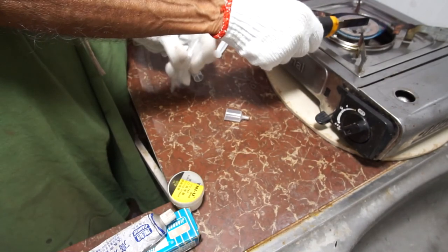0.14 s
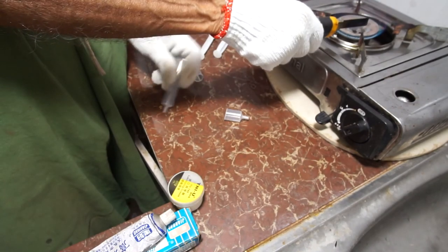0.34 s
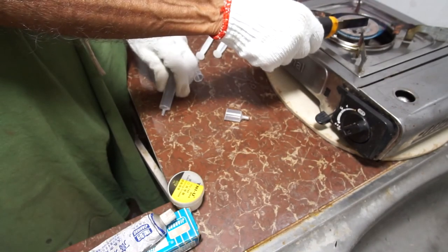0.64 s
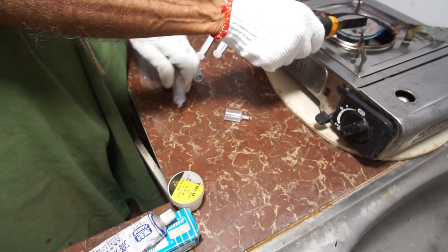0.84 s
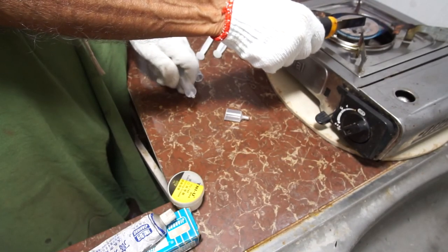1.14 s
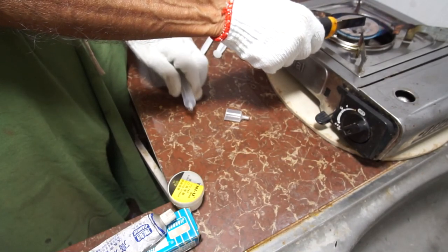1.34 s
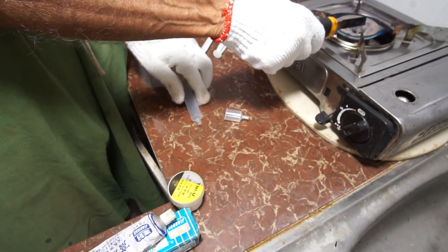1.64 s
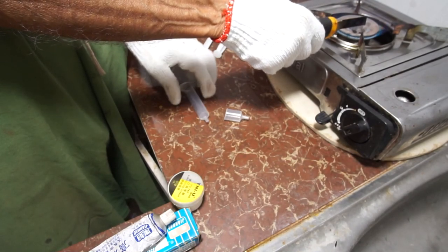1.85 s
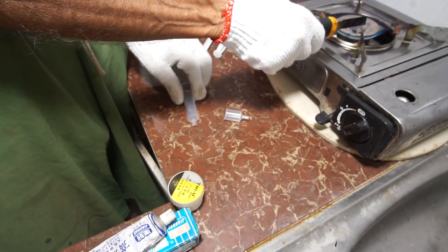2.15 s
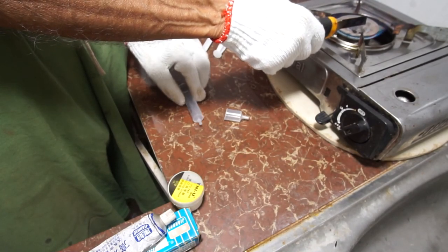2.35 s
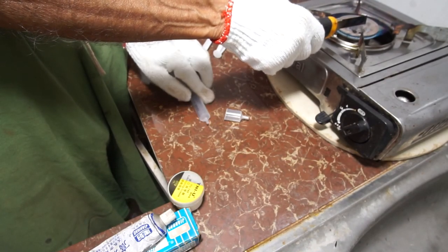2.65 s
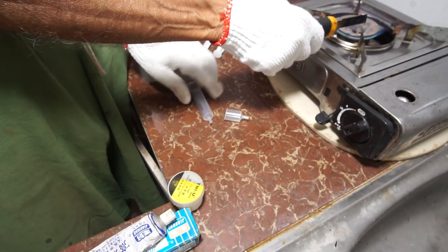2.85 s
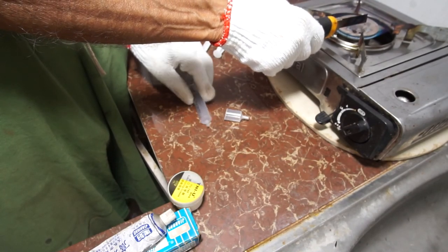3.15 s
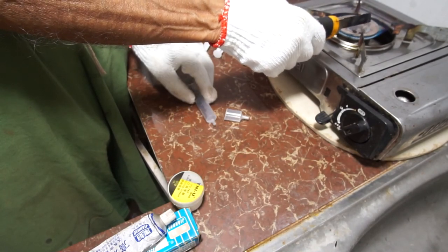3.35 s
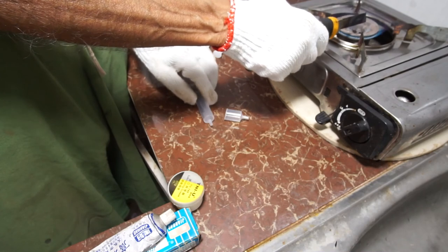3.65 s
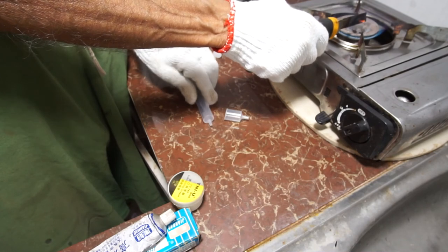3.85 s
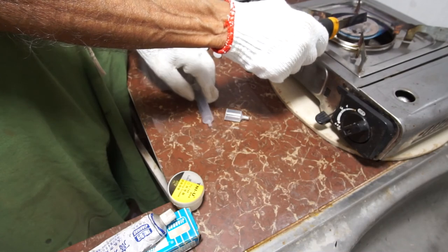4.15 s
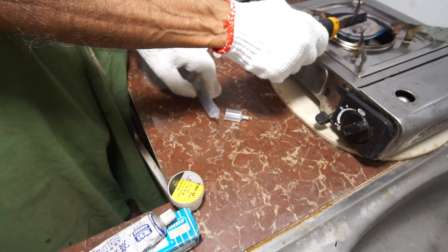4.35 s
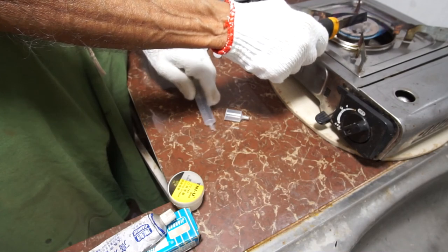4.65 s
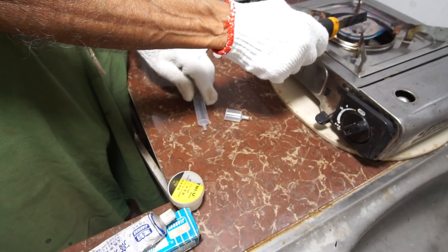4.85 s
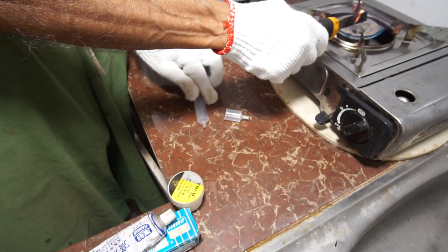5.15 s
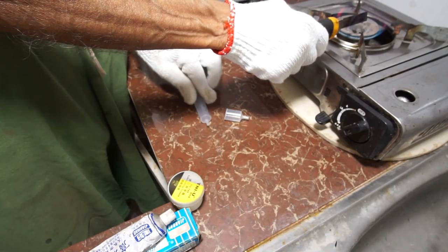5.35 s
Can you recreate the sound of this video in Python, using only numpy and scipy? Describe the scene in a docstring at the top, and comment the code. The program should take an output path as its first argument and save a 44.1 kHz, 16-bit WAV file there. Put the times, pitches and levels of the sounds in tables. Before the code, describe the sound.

In a small hard kitchen, a gas burner hums and hisses faintly with a thin unsteady high whistle. A gloved hand taps a plastic syringe on a stone counter: a small click at first, a rapid rattle before two seconds, a long near-quiet gap, then a click, a scrape and the loudest double tap near the end. Close stereo microphones; treble leans right.

```python
"""A gloved hand taps, rattles and slides a plastic syringe on a kitchen counter; clicks excite damped modes.
Beside it a gas burner runs: shaped noise makes the low hum of its flame and the hiss of its jet,
and a shaken sine makes the jet's thin, unsteady whistle. Filtered noise makes the sleeve and the slides.
The small kitchen answers each click with decaying noise, and loud sound makes the recorder turn its gain down."""
import sys
import numpy as np
from scipy import signal
from scipy.fft import rfft, irfft, next_fast_len
from scipy.io import wavfile
from scipy.ndimage import map_coordinates

SR = 44100
rng = np.random.default_rng(int(sys.argv[2]) if len(sys.argv) > 2 else 0)


def output_pcm(signal):
    """Save a mono or channel-first signal as 16-bit PCM at the path in sys.argv[1].

    Samples are clipped to [-1, 1] before scaling.
    """
    pcm = np.clip(np.atleast_2d(signal).T, -1, 1) * 32767
    wavfile.write(sys.argv[1], SR, np.round(pcm).astype(np.int16))


N = 241834

# stereo balance, negative to the right: (frequency [Hz], left over right [dB])
STEREO_LEAN = [(100, 0.7), (700, 0), (1700, -3), (3000, -6), (5200, -9.5), (7000, -6.5), (10000, -8.5)]


def amp(db):
    """Decibels to gain."""
    return 10 ** (np.asarray(db) / 20)


def unit(x):
    """Scale to rms 1."""
    return x / np.sqrt(np.mean(x ** 2) + 1e-20)


def along(points, hz):
    """Read (frequency, value) points on a log frequency axis."""
    point_hz, value = np.transpose(points)
    return np.interp(np.log(hz + 1), np.log(point_hz + 1), value)


def wobble(rate):
    """A smooth random curve of rms 1, with rate knots a second."""
    knots = rng.standard_normal(int(N * rate / SR) + 4)
    return unit(map_coordinates(knots, [np.arange(N) * rate / SR]))


def filtered(x, response):
    """Filter x by a response of frequency."""
    n = x.shape[-1]
    padded = next_fast_len(n + 8192)
    spectrum = rfft(x, padded) * response(np.fft.rfftfreq(padded, 1 / SR))
    return irfft(spectrum, padded)[..., :n]


def sides(lean_db):
    """Left and right gains for a level difference, left over right."""
    return amp(np.array([[.5], [-.5]]) * lean_db)


def diffuse(x):
    """Turn two unrelated noises into a left and right that are alike in the bass and less so in the treble."""
    # likeness of diffuse sound at the two microphones: (frequency [Hz], correlation [0-1])
    likeness = [(60, 1), (130, 0.91), (270, 0.88), (1000, 0.9), (5000, 0.77), (11000, 0.57)]

    def mid_side_gains(hz):
        turn = np.arccos(np.clip(along(likeness, hz), -1, 1)) / 2
        return np.array([np.cos(turn), np.sin(turn)])

    mid, side = filtered(x, mid_side_gains)
    return np.array([mid + side, mid - side])


def rush(gain):
    """Stereo noise of rms 1 with this gain over frequency, leaning right in the treble."""
    noise = diffuse(rng.standard_normal((2, N)))
    return unit(filtered(noise, lambda hz: gain(hz) * sides(along(STEREO_LEAN, hz))))


def coloured(spectrum):
    """Stereo noise of rms 1 shaped by a (frequency, level) spectrum."""
    return rush(lambda hz: amp(along(spectrum, hz)))


def burner():
    """The flame hums and flutters; the gas hisses, more as it runs, and its tube's resonances colour the noise."""
    # relative noise spectra of flame hum and gas hiss: (frequency [Hz], level [dB per Hz])
    flame_spectrum = [(20, -34), (32, -29), (50, -11), (64, -11), (92, -1), (120, -10.5), (165, -18),
                      (300, -32), (800, -63)]
    hiss_spectrum = [(100, -49), (220, -1.5), (340, -0.5), (600, -6), (790, -11.5), (980, -2.5),
                     (1380, -12), (1630, 0.5), (2150, -7), (2650, -9.5), (4000, -23), (5000, -25),
                     (6200, -31), (11000, -32)]
    # resonances of the burner and its jet tube: (frequency [Hz], width [Hz], relative level [dB])
    tube_modes = [(1626, 45, 7), (1907, 73, 5.5), (2140, 74, 5), (2320, 39, 5.5), (3576, 240, -6),
                  (4130, 190, -8.5), (4532, 118, 12.5), (4598, 42, 14), (4805, 210, -4.5), (5170, 42, 1.5),
                  (5565, 210, -5), (7040, 300, -15), (8010, 670, -19.5), (8840, 154, -8.5),
                  (9170, 540, -12.5), (10220, 500, -18)]
    gas_start_db, gas_full_db, gas_rise_s = -54.5, -50.5, 2.04
    flame_full_db, flame_follows = -50, 0.4  # level at full gas; share of the gas's rise it follows
    tube_full_db, tube_follows = -49.5, 0.076

    rise = np.minimum(np.arange(N) / SR / gas_rise_s, 1)
    gas_db = gas_start_db + (gas_full_db - gas_start_db) * rise
    below_full_db = gas_db - gas_full_db

    flutter_db = 1.15 * wobble(5.57)
    flame = amp(flame_full_db + flame_follows * below_full_db + flutter_db) * coloured(flame_spectrum)

    flow_db = 0.47 * wobble(3.03)  # shared by hiss and tube
    hiss = amp(gas_db + flow_db) * coloured(hiss_spectrum)

    def tube_gain(hz):
        power = 0
        for mode_hz, width_hz, db in tube_modes:
            power = power + amp(db) ** 2 / (1 + (2 * (hz - mode_hz) / width_hz) ** 2) ** 2
        return np.sqrt(power)

    tube_db = tube_full_db + tube_follows * below_full_db + flow_db + 1.35 * wobble(11)
    return flame + hiss + amp(tube_db) * rush(tube_gain)


def whistle():
    """The jet sings one thin note; turbulence shakes its strength and phase and smears it into a narrow band."""
    # the whistle's course, before the overall lift: (time [s], level [dB])
    course = [(0.0, -51), (0.29, -47), (0.65, -54.5), (0.75, -42.5), (0.85, -56.5), (1.25, -46), (1.5, -57),
              (1.68, -48.5), (1.95, -54), (1.96, -49.5), (2.41, -52), (2.45, -58.5), (2.78, -45.5),
              (2.85, -53), (3.4, -46.5), (3.45, -55.5), (4.46, -60.5), (5.0, -54)]
    pitch_hz, lift_db = 4558, 2
    waver_db, waver_per_s = 1, 15  # quick random wavering of its strength

    level_db = np.interp(np.arange(N) / SR, *np.transpose(course))
    phase = 2 * np.pi * np.cumsum(pitch_hz + 6 * wobble(20)) / SR  # the pitch strays by 6 Hz rms
    slow_shake = 0.37 * (wobble(40) + 1j * wobble(40))
    fast_shake = 0.12 * (wobble(190) + 1j * wobble(190))
    shaken = np.real((1 + slow_shake + fast_shake) * np.exp(1j * phase))
    note = unit(amp(waver_db * wobble(waver_per_s)) * shaken)
    return amp(level_db + lift_db) * sides(lean_db=-7.0) * note


def swells(rows, attack_s, release_s, press_db_per_s):
    """Gain of (start, length, end level) spans: each sets in, grows by the pressing rate and stops."""
    t, gain = np.arange(N) / SR, np.zeros(N)
    for start_s, length_s, db in rows:
        left_s = start_s + length_s - t
        gate = np.clip((t - start_s) / attack_s, 0, 1) * np.clip(1 + left_s / release_s, 0, 1)
        gain += gate * amp(db - press_db_per_s * np.clip(left_s, 0, length_s))
    return gain


def hand():
    """The sleeve rustles, less while the arm is held still, and the syringe tip drags unevenly over the stone."""
    # faint cloth rustle, stronger while the arm moves, lower while it is held still:
    # (start [s], length [s], level before wavering [dB])
    rustles = [(0, 1.62, -57), (1.65, 2.75, -60.5), (4.4, .66, -49.5)]
    # strokes of the tip over the stone: (start [s], length [s], level at the end before wavering [dB])
    strokes = [(3.39, 0.11, -63), (4.03, .09, -64), (4.646, .42, -45)]
    # relative noise spectra of cloth and sliding plastic: (frequency [Hz], level [dB per Hz])
    sleeve_spectrum = [(80, -18), (250, 0.5), (420, 3), (700, 2), (1000, -20), (1500, -40), (4000, -29)]
    slide_spectrum = [(600, -15), (1050, -5), (1350, -15), (2000, -7), (2400, -1.5), (2620, -1),
                      (3100, -14.5), (4000, -23), (6500, -28), (11000, -51)]

    rustle = swells(rustles, attack_s=0.036, release_s=.045, press_db_per_s=0)
    drag = swells(strokes, attack_s=.03, release_s=.03, press_db_per_s=13)
    sleeve = rustle * amp(1.85 * wobble(14)) * coloured(sleeve_spectrum)
    slide = drag * amp(1.4 * wobble(60)) * coloured(slide_spectrum)
    return sleeve + slide


def pulse(gain):
    """The causal (minimum-phase) pulse of peak 1 that has this spectrum."""
    cepstrum = irfft(np.log(np.maximum(gain, 1e-6)))
    cepstrum[1:] *= 2
    cepstrum[len(cepstrum) // 2:] = 0  # folding onto positive time makes it causal
    x = irfft(np.exp(rfft(cepstrum)))
    return x / np.abs(x).max()


def ring(modes, t, attack, scatter_db, drift=0.44):
    """Damped modes, struck at new strengths and phases; random phase drift blurs each ringing mode."""
    hz, db, t60 = np.transpose(modes)[:, :, None]
    db = db + scatter_db * rng.standard_normal(hz.shape)
    steps = rng.standard_normal((len(hz), len(t)))
    wander = drift * np.cumsum(steps, axis=1) / np.sqrt(SR * t60)  # in cycles
    waves = np.sin(2 * np.pi * (hz * t + rng.random(hz.shape) + wander))
    return (amp(db - 60 * t / t60) * waves).sum(0) * (1 - np.exp(-t / attack))


def kitchen(x, near_db, near_t60, far_db, onset):
    """Stove and counter scatter the sound at once; the walls add a longer tail."""
    # the walls' decay: (frequency [Hz], time to fall 60 dB [s])
    wall_decay = [(200, 0.41), (1000, 0.61), (3000, 0.36), (6000, 0.47), (11000, 0.36)]
    t = np.arange(len(x)) / SR

    hz, s, bands = signal.stft(rng.standard_normal((2, len(x))), SR, nperseg=256)
    decayed = bands * amp(-60 * s / along(wall_decay, hz)[:, None])
    far = signal.istft(decayed, SR, nperseg=256)[1][:, :len(x)]
    near = rng.standard_normal((2, len(x))) * amp(-60 * t / near_t60)

    def spread(tail):
        return unit(tail * (1 - np.exp(-(t / onset) ** 2))) / np.sqrt(len(x))  # energy 1 a side

    answer = diffuse(amp(near_db) * spread(near) + amp(far_db) * spread(far))
    return signal.fftconvolve(x[None], answer, axes=1)[:, :len(x)]


def tap(pitch_hz, grip_db, treble_db, knock_db, size=16384):
    """One contact: a sharp click, a few milliseconds of chatter, then the barrel and the counter ring."""
    # bare click of hard plastic on stone: (frequency [Hz], relative level [dB])
    click_spectrum = [(60, -32), (250, -28), (750, -22.5), (1080, -11), (1400, -12.5), (1900, -5),
                      (2700, -2), (3800, -0.5), (4700, -6), (6300, -10.5), (7900, -13), (9200, -9),
                      (11000, -15.5)]
    # ringing of the syringe: (frequency [Hz], relative level [dB], time to fall 60 dB [s])
    barrel_modes = [(1910, -4, .07), (2110, -6, .12), (2310, -5, .13), (2620, -3, .12), (2835, -1, .13),
                    (3035, -6, .1), (3170, -4, .09), (3540, -2, .11), (3700, -3, .11), (3775, -2, .12),
                    (4130, -9, .1)]
    # ringing of the counter and what stands on it:
    # (frequency [Hz], relative level [dB], time to fall 60 dB [s])
    counter_modes = [(240, -13, .08), (520, -15, .05), (996, 2.5, .14), (1061, -4, .31), (1227, -7, .1),
                     (1530, -8, .08), (1868, -8, .14), (2075, -4, .13), (2492, -10, .2), (3951, -7, .13)]
    t, hz = np.arange(size) / SR, np.fft.rfftfreq(size, 1 / SR)

    held = 1 / (1 + ((hz / pitch_hz - 1) / .12) ** 2)  # the held barrel's heavily damped main resonance
    hardness = 1 / (1 + (5400 / (hz + 1)) ** 8)  # harder contacts reach further into the treble
    click = pulse(amp(along(click_spectrum, hz) + grip_db * held + treble_db * hardness))

    touches = rng.standard_normal(size) * amp(-60 * t / 0.018) * (1 - np.exp(-(t / 0.0011) ** 2))
    chatter = signal.fftconvolve(click, touches / np.linalg.norm(touches))[:size]
    chatter = filtered(chatter, lambda f: 1 / (1 + 1j * f / 5200) ** 2)  # softer than the first touch

    free = amp(-30 - grip_db / 2)  # a firm grip mutes the ring
    barrel = free * ring(barrel_modes, t, attack=0.00077, scatter_db=8.5)
    counter = amp(knock_db - 27) * ring(counter_modes, t, attack=0.0015, scatter_db=3.0)
    return click + amp(2.0) * chatter + barrel + counter


def syringe():
    """Every contact fills the kitchen with its echo and leans right in the treble."""
    # contacts: (time [s], level of the bare click's peak before panning [dB], barrel pitch [Hz],
    # strength of that resonance [dB], treble boost [dB], relative counter knock [dB])
    contacts = [(0.3097, -17, 4470, 19, 5.5, 11), (0.3118, -21.5, 1720, 13, -6.5, 0),
                (0.3141, -23, 4100, 12, 19, 9), (0.3202, -22.5, 2150, 13, -6, 13.5),
                (1.6274, -11.5, 2830, 2.5, -11, -13), (1.6466, -16.5, 3000, 9, -11, -6),
                (1.6604, -17.5, 3600, 7, -9, -10), (1.6847, -6, 3700, 6.5, -2, -14.5),
                (1.7093, -11, 2900, 5, -3.5, -12), (1.7281, -14, 3640, 7.5, -6, -14),
                (1.8066, -25, 3800, 13.5, -4.5, -9), (3.0230, -34, 3120, 2, -6, -14),
                (3.073, -30, 5200, 22, -6, -20), (4.6189, -9.5, 3560, 9.5, -17, 1),
                (5.0688, 2.5, 2910, 11, 0.5, -6.5), (5.072, -3.5, 3100, 2, 0, -8.5),
                (5.1889, -10, 2640, 8.5, 0, -7.5), (5.1912, -13.5, 3860, 7, -7, -23),
                (5.1940, -11.5, 4240, 13, -6, -17.5)]
    out = np.zeros((2, N + SR))
    for s, db, pitch_hz, grip_db, treble_db, knock_db in contacts:
        hit = amp(db) * tap(pitch_hz, grip_db, treble_db, knock_db)
        echo = kitchen(hit, near_db=-4.0, near_t60=0.093, far_db=-6.5, onset=0.00096)
        start = round(s * SR)
        out[:, start:start + len(hit)] += hit + echo
    return filtered(out[:, :N], lambda hz: sides(0.63 * along(STEREO_LEAN, hz)))


def thuds(size=16384):
    """The hand's weight lands with two of the taps and pushes the counter once each time."""
    # landings: (time [s], peak level of the push without its echo [dB])
    landings = [(0.3098, -36.5), (5.0686, -33)]
    # the counter's dull answer: (frequency [Hz], relative level [dB])
    thud_spectrum = [(30, -35), (90, 8.5), (250, 3), (700, -1), (1300, -17.5), (4000, -60)]
    out = np.zeros((2, N + SR))
    push = pulse(amp(along(thud_spectrum, np.fft.rfftfreq(size, 1 / SR))))
    for s, db in landings:
        echo = kitchen(push, near_db=3.5, near_t60=0.098, far_db=-12, onset=0.00057)
        start = round(s * SR)
        out[:, start:start + size] += amp(db) * (push + echo)
    return out[:, :N]


def scene():
    """Syringe and hand beside the running burner, heard by two microphones that differ in phase."""
    # the left microphone's lead over the right: (frequency [Hz], phase [rad])
    left_lead = [(60, 0.14), (130, 0.5), (340, 1.27), (700, 1.84), (2200, 1.4), (4700, 1.41), (5600, 1.54),
                 (6500, 1.3), (11000, 0.86)]
    sound = syringe() + thuds() + hand() + burner() + whistle()
    return filtered(sound, lambda hz: np.exp(.5j * np.array([[1], [-1]]) * along(left_lead, hz)))


def record(dry):
    """Gain control ducks after a loud sound and recovers slowly; peaks round off; the top of the treble is cut."""
    threshold_db, most_db, release_s = -22, 5.0, 3.2
    ceiling, top_hz = 0.7, 11000
    t = np.arange(N) / SR

    power = signal.lfilter(np.ones(441) / 441, 1, np.mean(dry ** 2, axis=0))  # 10 ms average
    over_db = np.clip(10 * np.log10(np.abs(power) + 1e-12) - threshold_db, 0, most_db)
    # hold the largest excess while it dies away
    duck_db = np.maximum.accumulate(over_db * np.exp(t / release_s)) * np.exp(-t / release_s)
    ease = np.exp(-1 / (0.005 * SR))  # the gain eases over 5 ms
    ducked = dry * amp(-signal.lfilter([1 - ease], [1, -ease], duck_db))

    rounded = ducked / (1 + (ducked / ceiling) ** 4) ** (1 / 4)
    steep = signal.ellip(12, .1, 80, top_hz, fs=SR, output="sos")
    return signal.sosfilt(steep, rounded)


dry = scene()
out = record(dry)
output_pcm(out)
```